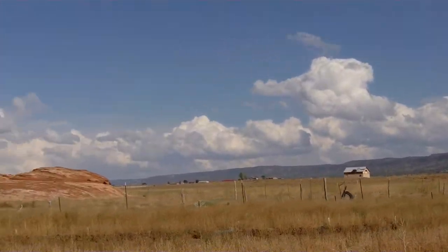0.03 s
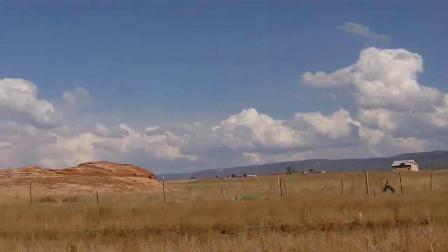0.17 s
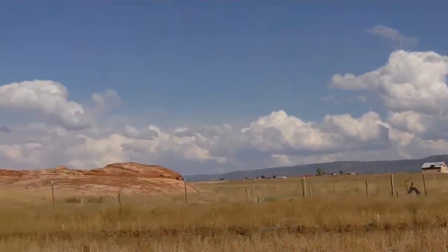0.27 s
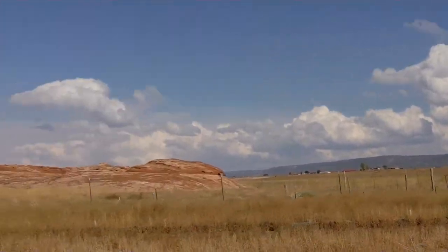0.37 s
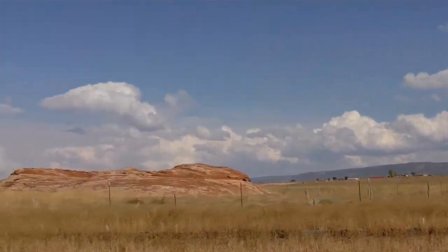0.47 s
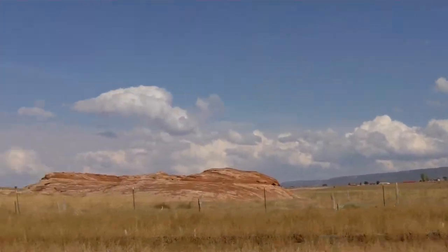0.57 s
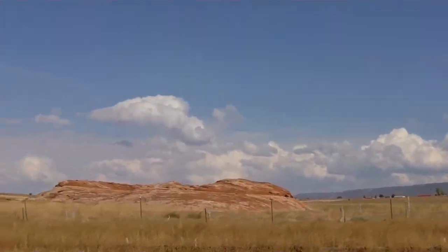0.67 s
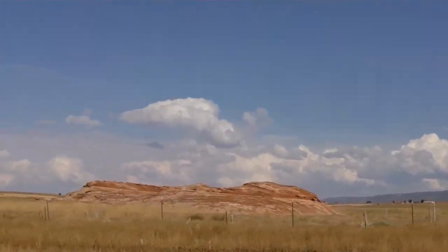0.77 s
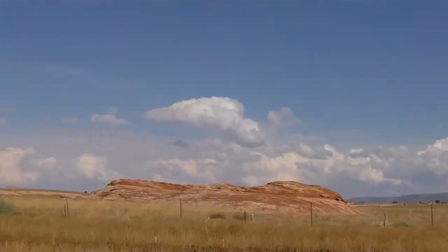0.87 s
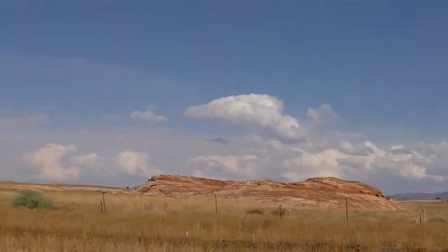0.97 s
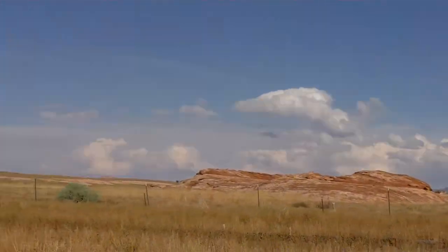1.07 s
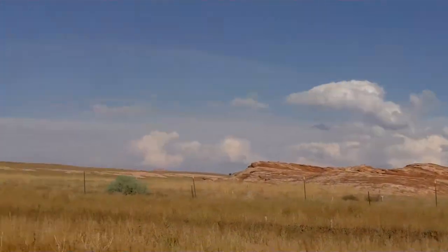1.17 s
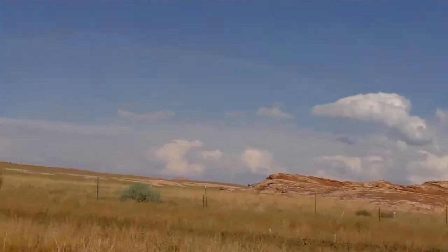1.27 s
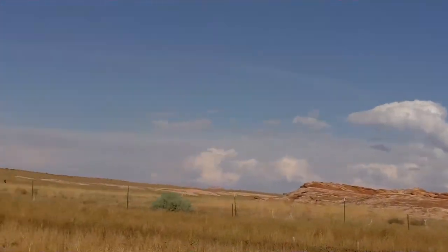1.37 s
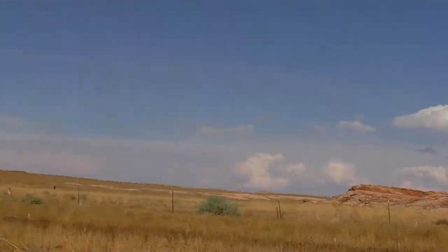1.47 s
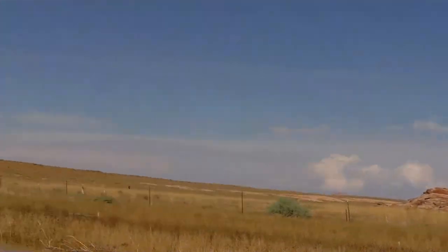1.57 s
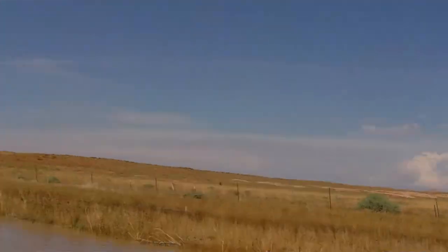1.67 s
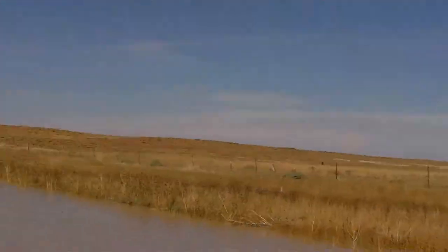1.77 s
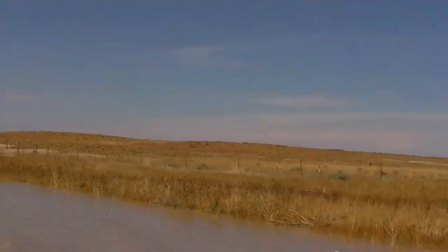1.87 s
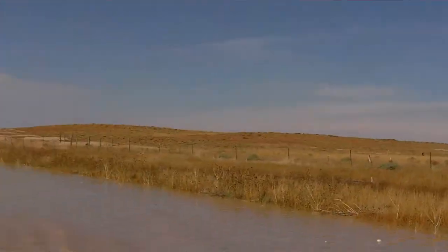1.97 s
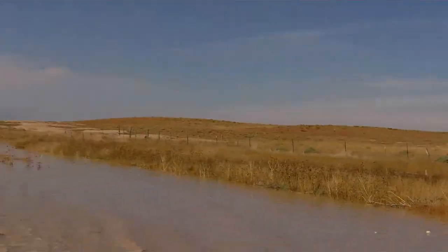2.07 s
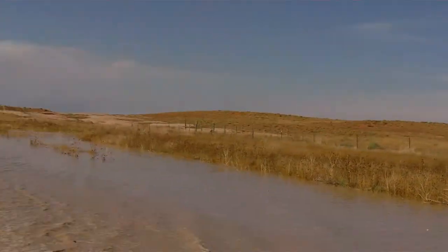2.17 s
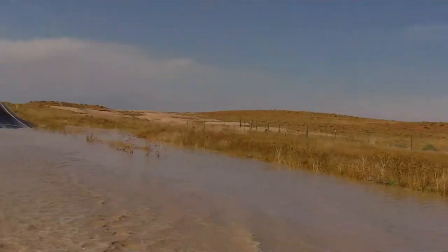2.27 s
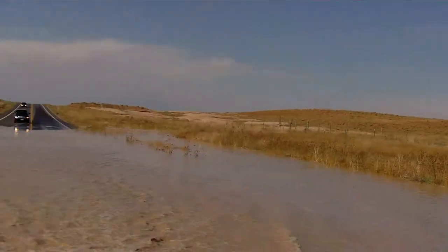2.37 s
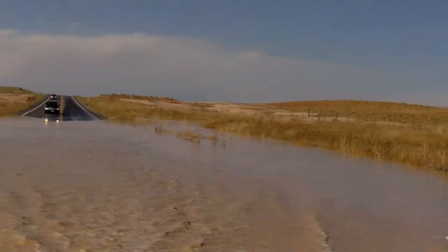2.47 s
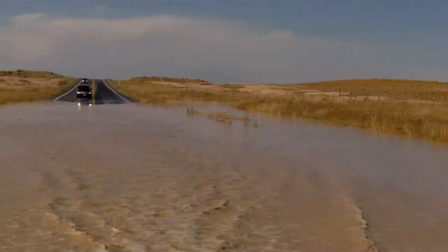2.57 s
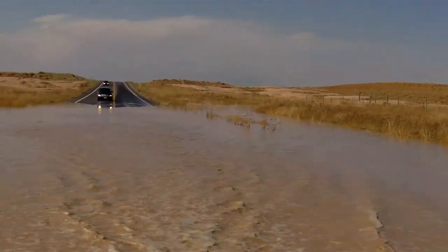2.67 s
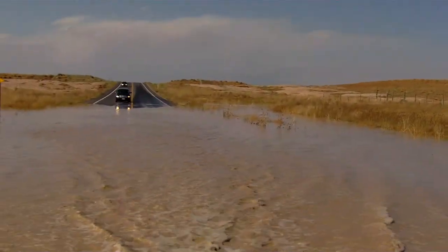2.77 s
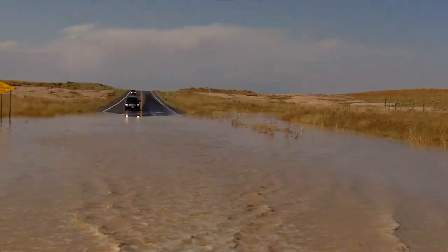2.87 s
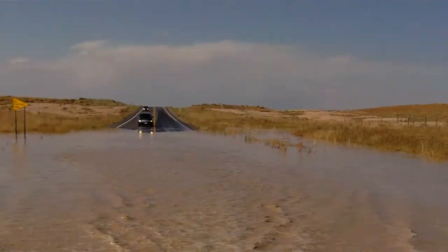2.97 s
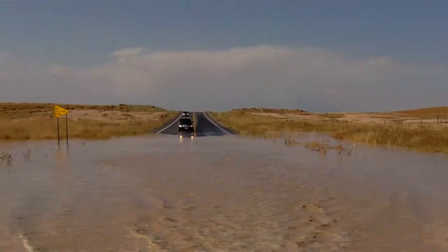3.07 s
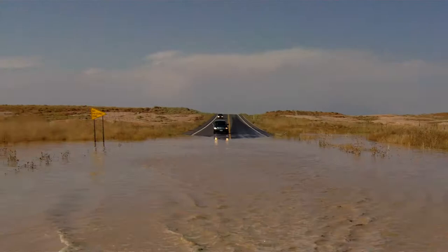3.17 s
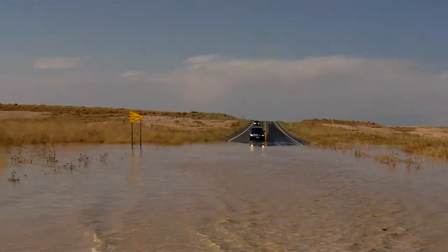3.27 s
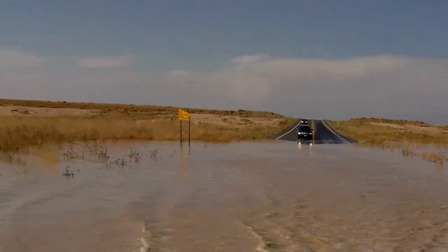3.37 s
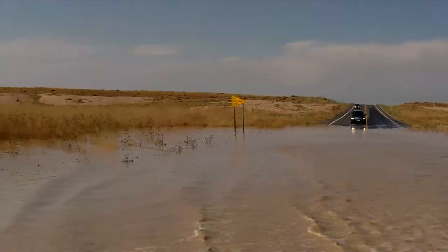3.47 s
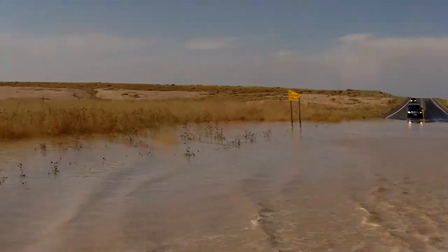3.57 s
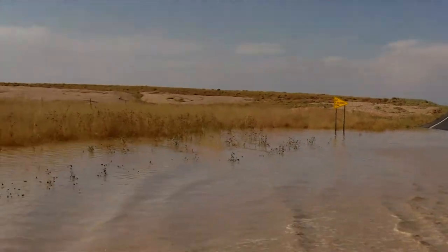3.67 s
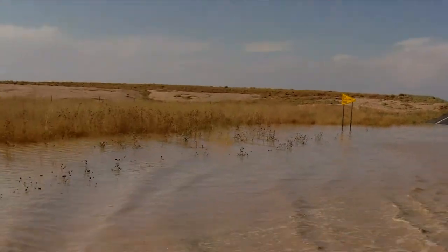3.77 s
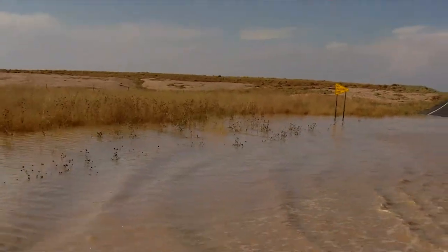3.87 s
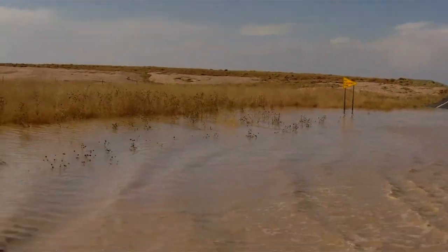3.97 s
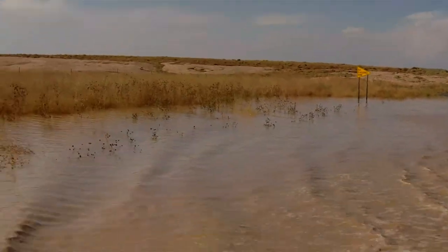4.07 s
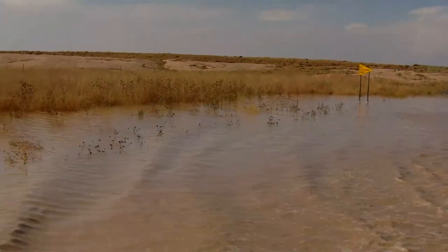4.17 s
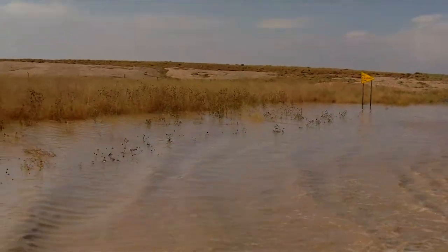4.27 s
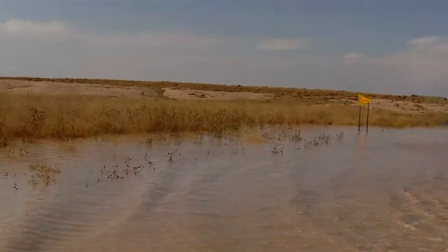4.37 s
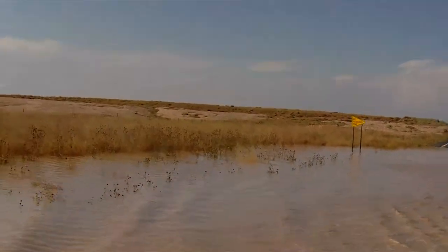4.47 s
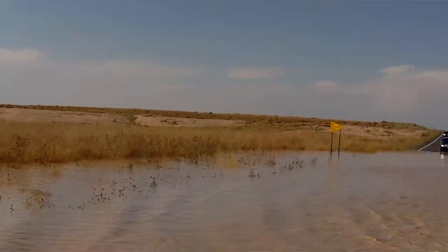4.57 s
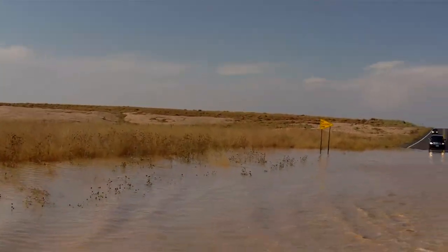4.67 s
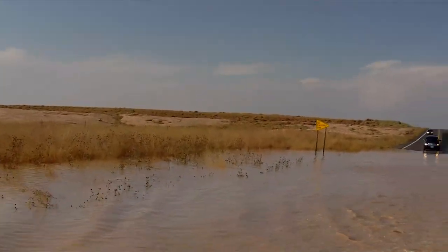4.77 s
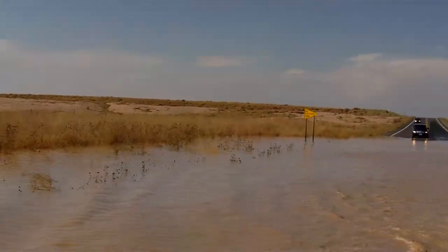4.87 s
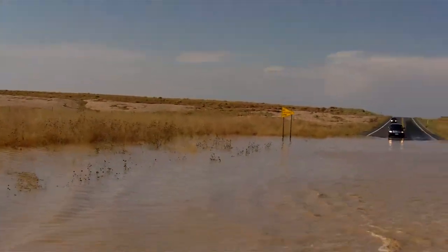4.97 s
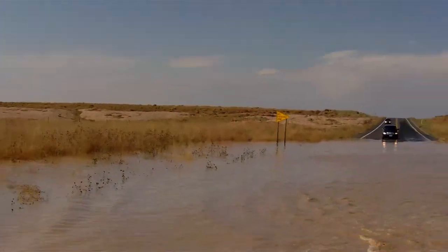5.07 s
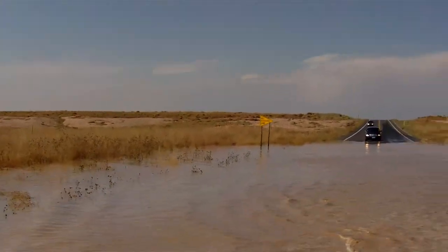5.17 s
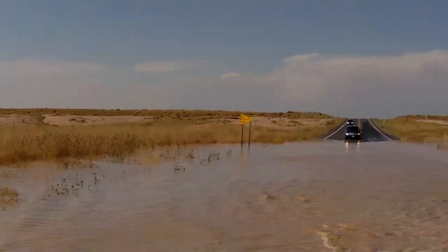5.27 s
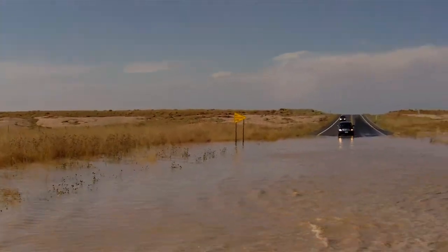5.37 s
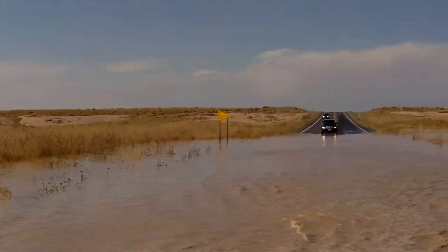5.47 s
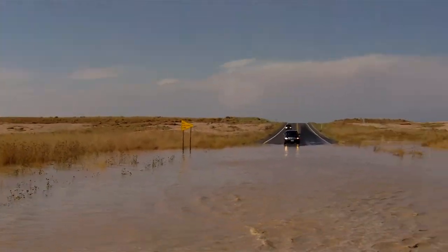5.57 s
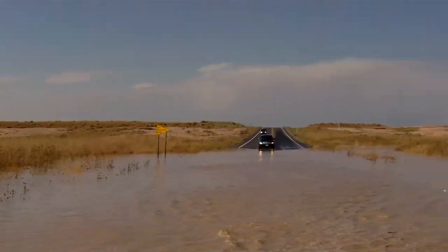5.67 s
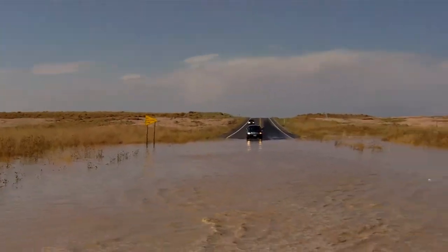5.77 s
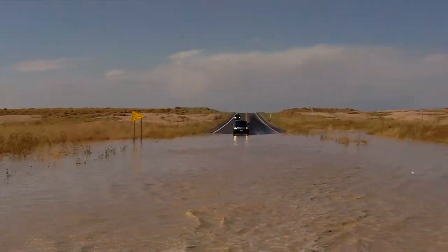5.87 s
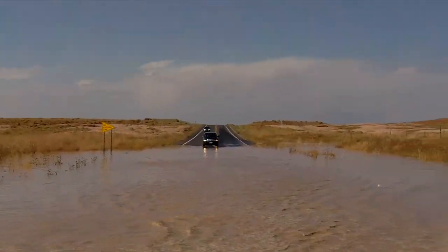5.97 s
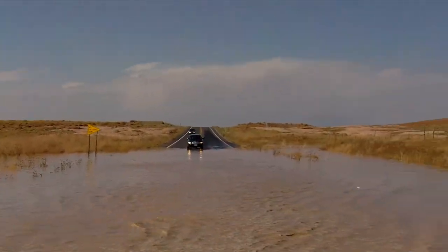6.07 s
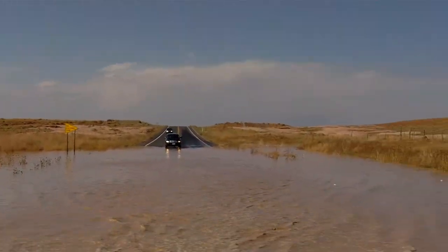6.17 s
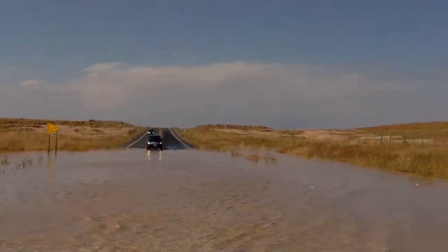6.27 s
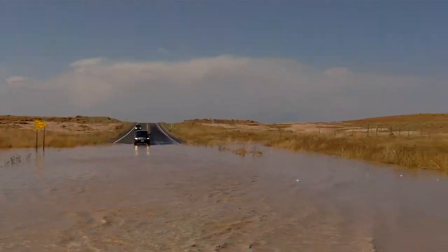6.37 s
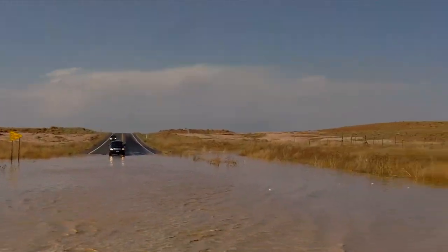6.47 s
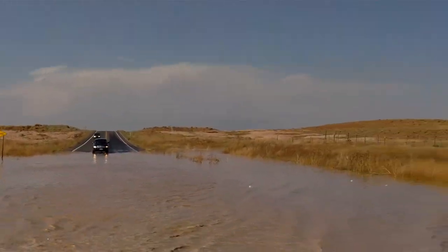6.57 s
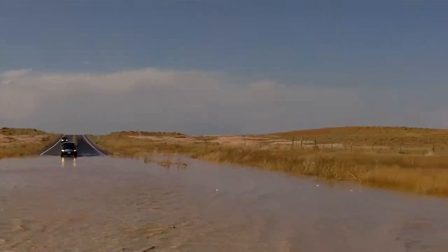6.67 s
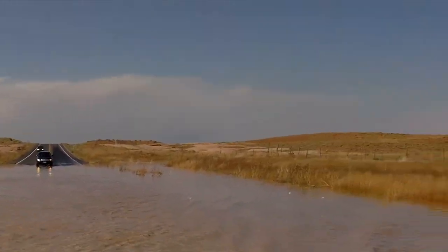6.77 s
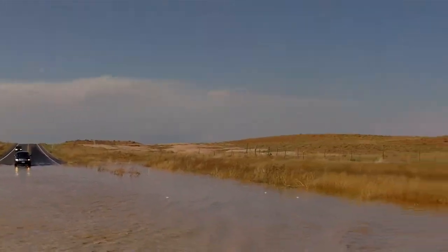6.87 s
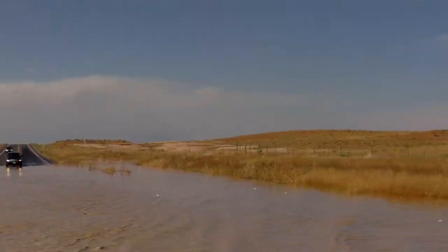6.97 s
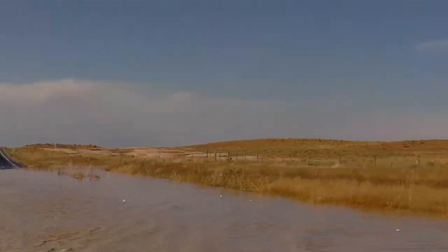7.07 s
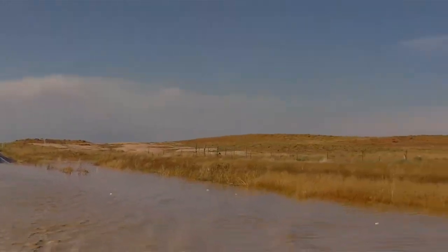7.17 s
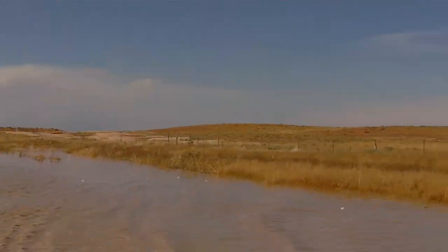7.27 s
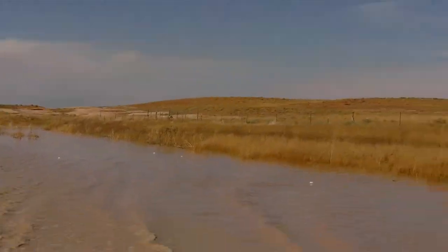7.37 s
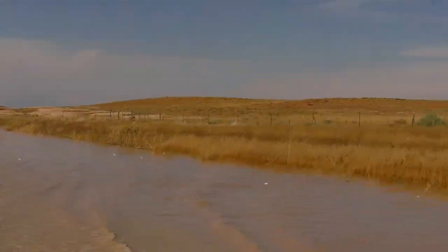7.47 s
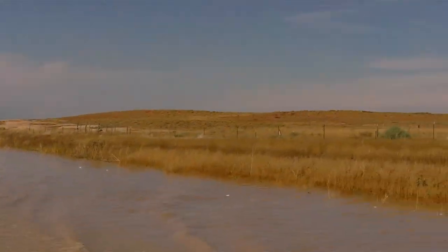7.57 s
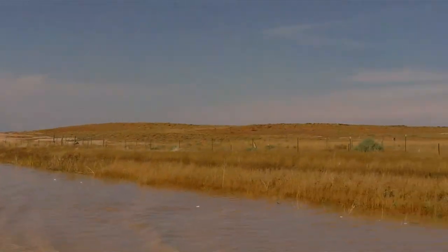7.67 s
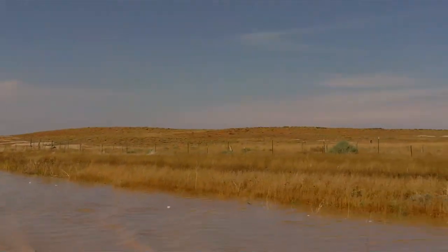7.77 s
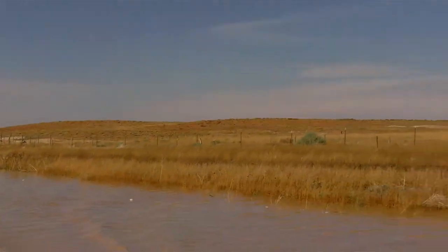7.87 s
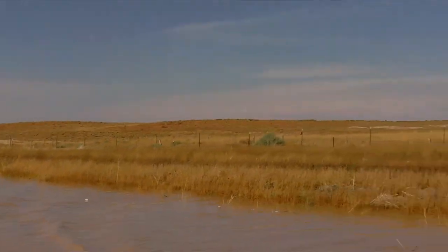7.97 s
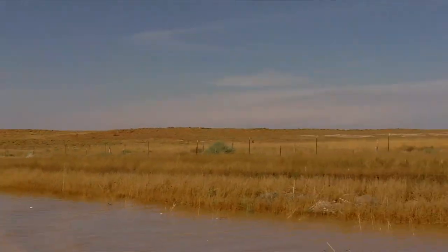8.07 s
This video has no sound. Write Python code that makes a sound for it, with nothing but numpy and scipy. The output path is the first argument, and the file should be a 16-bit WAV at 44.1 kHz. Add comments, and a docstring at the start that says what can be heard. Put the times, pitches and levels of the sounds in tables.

```python
"""A bow wave churns and gurgles, its wash slaps the bodywork and spray hisses in surges: a vehicle wades
slowly through deepening floodwater, heard from its window. Low blips stand out, drops snap nearby, the
floor pan thumps, the engine hums faintly. Water is patchy noise plus swarms of bubbles (damped sines of
rising pitch); the engine is three sines. One microphone feeds both channels, the left a sample late."""
import sys
import numpy as np
from scipy import signal
from scipy.fft import rfft, irfft, next_fast_len
from scipy.io import wavfile
from scipy.ndimage import uniform_filter1d, map_coordinates

SR = 44100
rng = np.random.default_rng(int(sys.argv[2]) if len(sys.argv) > 2 else 0)


def digitize_waveform(pressure):
    """Quantize a signal to 16-bit integers and store it at the path in sys.argv[1].

    Rows of a 2-D input are taken as channels; values are limited to [-1, 1].
    """
    field = np.atleast_2d(pressure).T
    bounded = np.clip(field, -1, 1)
    quanta = np.round(bounded * 32767).astype(np.int16)
    wavfile.write(sys.argv[1], SR, quanta)


def attenuation_scalar(level_db):
    """Turn a level in dB into a linear amplitude multiplier (20 dB per decade)."""
    decades = np.asarray(level_db, float) / 20
    return 10 ** decades


N = 358533  # samples


def unit(x):
    """x scaled to rms 1."""
    return x / np.sqrt(np.mean(x ** 2) + 1e-20)


def curves(rows):
    """One value per sample for each column after the time."""
    time_s, *columns = np.transpose(rows)
    return [np.interp(np.arange(N) / SR, time_s, column) for column in columns]


def wobble(knots_per_s):
    """Smooth random curve."""
    return map_coordinates(rng.standard_normal(N // 100), [np.arange(N) * knots_per_s / SR])


def swells(peak_s, swell_db, fall_s):
    """Sum of bell-shaped swells (dips where negative) in dB, quicker to come than to go."""
    rise_share = 0.66  # rise time / fall time
    t = np.arange(0, N + 64, 64) / SR
    age = (t - peak_s[:, None]) / (fall_s * np.ones_like(peak_s))[:, None]
    age = np.where(age < 0, age / rise_share, age)
    bells = swell_db[:, None] * np.exp(-age ** 2)
    return np.interp(np.arange(N) / SR, t, bells.sum(axis=0))


def along(points, hz):
    """(Hz, value) points read on a log frequency axis."""
    f, v = np.transpose(points)
    return np.interp(np.log(hz + 1), np.log(f), v)


def filtered(x, response):
    """x through a complex response of frequency."""
    m = next_fast_len(N + SR // 4)
    return irfft(rfft(x, m) * response(np.fft.rfftfreq(m, 1 / SR)), m)[..., :N]


def high_pass(corner_hz):
    """Zero-phase response, -6 dB at the corner."""
    return lambda hz: 1 / (1 + (corner_hz / (hz + 1)) ** 4)


def coloured(x, spectrum):
    """x shaped by (Hz, dB) points, rms 1."""
    return unit(filtered(x, lambda hz: attenuation_scalar(along(spectrum, hz))))


def patchy(patch_db, bins, frames):
    """Noise whose level drifts in patches of time and frequency, rms 1."""
    z = signal.stft(rng.standard_normal(N), nperseg=512)[2]
    field = uniform_filter1d(rng.standard_normal(z.shape), size=bins, axis=0)
    field = uniform_filter1d(field, size=frames, axis=1)
    return unit(signal.istft(z * attenuation_scalar(patch_db * unit(field)), nperseg=512)[1][:N])


def rising_rings(start_s, hz, gain, cycles, rise, size, onset=6.9):
    """Damped sines with a soft start and a rising pitch, as of a bubble nearing the surface."""
    turns = np.arange(size) / SR * hz[:, None]
    age = turns / cycles  # decay times elapsed
    envelope = (1 - np.exp(-onset * age)) * np.exp(-age)
    shape = envelope * np.sin(2 * np.pi * turns * (1 + rise * age / 2))
    where = (start_s * SR).astype(int)[:, None] + np.arange(size)
    return np.bincount(where.ravel(), (gain[:, None] * shape).ravel(), N + size + 1)[:N]


def swarm(count, hz, octaves, spread_db, cycles, rise, size):
    """Bubbles at random times, log-normal in pitch and in amplitude, rms 1."""
    start_s = rng.random(count) * N / SR
    tone, big = rng.standard_normal((2, count))
    pitch_hz = np.clip(hz * 2 ** (octaves * tone), 300, 15000)
    return unit(rising_rings(start_s, pitch_hz, attenuation_scalar(spread_db * big), cycles, rise, size))


# flow under the swells and dips: (time [s], churn level [dB], wash level [dB], spray level [dB])
FLOW_LEVELS = [(0.0, -30, -38.5, -51.5), (0.7, -30, -37, -50.5), (0.8, -31.5, -38, -51),
               (1.3, -31, -36.5, -44.5), (1.75, -29, -36.5, -44.5), (1.87, -27.5, -31.5, -40.5),
               (2.28, -27, -33.5, -35), (2.45, -26.5, -31.5, -32), (2.8, -25, -30.5, -32),
               (3.2, -26.5, -31, -33), (3.45, -25.5, -29, -30), (4.3, -26, -27, -31),
               (5.0, -25.5, -29, -31.5), (5.45, -25, -27, -28.5), (5.55, -26, -31, -36.5),
               (6.0, -26, -31, -36), (6.8, -29.5, -29.5, -34.5), (7.25, -27, -29, -33.5),
               (7.55, -28, -27, -32), (8.13, -25.5, -30, -35)]
# swells and dips of the water's level, with a burst of short clicks near 2.35 s:
# (peak time [s], fall time [s], churn swell [dB], wash swell [dB], spray swell [dB])
WATER_SWELLS = [(0.035, 0.036, 1.5, 1.5, 1), (0.29, 0.05, 0.5, 0.5, -1), (0.603, 0.058, -0.5, 1.5, 2),
                (0.91, 0.057, 0.5, 2.5, 3), (0.96, .03, 3, -2, -5), (1.215, 0.044, 0.5, -0.5, 3),
                (1.36, 0.043, 0, 2, 2), (1.59, 0.15, -0.5, 2, 2), (1.897, 0.057, -1, 2, 5),
                (2.053, 0.03, 0, 2.5, 4), (2.17, 0.037, 0.5, 1.5, 2.5), (2.33, .007, 0, -5, 6.5),
                (2.352, 0.0073, 0, 4, 9), (2.376, 0.011, -3, -1, 6.5), (2.38, 0.057, 2, 4, -1),
                (2.583, 0.072, -0.5, 4, 3), (2.747, 0.063, 0.5, 2.5, 3), (2.938, 0.035, -0.5, 2, 4.5),
                (3.037, 0.023, 1, 3, 3), (3.146, 0.015, 1, 2.5, 3), (3.37, 0.062, 0.5, 3, 2.5),
                (3.557, 0.048, 1, 4, 4), (3.89, 0.021, 3.5, 2, 4), (4.108, 0.051, 0.5, 2, 3.5),
                (4.224, 0.026, 0.5, 1.5, 2.5), (4.55, 0.084, 0, -0.5, 3), (4.61, 0.024, -0.5, 2.5, 0),
                (4.744, 0.03, 1, 0.5, 5.5), (4.85, 0.037, 1, 1.5, 4), (4.902, 0.067, -2, 3, 3.5),
                (4.97, 0.066, 1.5, 3, 3), (5.048, 0.04, -2, 1.5, 0.5), (5.13, 0.024, 1.5, 4, 6),
                (5.213, 0.045, -1, 1.5, 1.7), (5.435, 0.041, 0.5, 1.5, 0), (5.677, 0.22, -1, 2, 8),
                (5.83, 0.079, 1, 3, 5), (5.99, 0.048, -1, 1.5, 6.5), (6.076, 0.054, -0.5, 2, 6.5),
                (6.21, 0.052, 0.5, 1, 4.5), (6.338, 0.0054, -2, 4, 8.5), (6.416, 0.054, 0.5, 2, 6.5),
                (6.595, .04, 1, -1, 4), (6.648, 0.031, 2.5, 3.5, 4.5), (6.69, .05, 1, 2.5, 5.5),
                (6.9, 0.05, 3, 2, 4), (7.118, 0.034, -2, 1, 3), (7.327, 0.036, -0.5, 0, 4),
                (7.49, 0.05, 2, 2, 1.5), (7.666, 0.035, 0, 3.5, 2), (7.842, 0.026, 1, 4.5, 5.5),
                (7.916, 0.039, 0, 4, 2), (8.005, 0.023, -0.5, 4.5, 2)]


def water():
    """Churn, wash and spray ride one flow; the finer the water, the more unsteady its level."""
    churn_db, wash_db, spray_db = curves(FLOW_LEVELS)
    peak_s, fall_s, *swell_db = np.transpose(WATER_SWELLS)
    churn_swell_db, wash_swell_db, spray_swell_db = (swells(peak_s, db, fall_s) for db in swell_db)
    surge, flutter = wobble(36), wobble(60)  # shared by the layers
    churn_level_db = churn_db + churn_swell_db - 0.4 * wobble(22) + 0.13 * surge
    wash_level_db = wash_db + wash_swell_db + 0.05 * wobble(14) + 0.11 * surge + 0.44 * flutter
    spray_level_db = spray_db + spray_swell_db - 0.22 * wobble(16) + 0.71 * surge + 0.76 * flutter
    return (attenuation_scalar(churn_level_db) * churn(churn_swell_db, wash_swell_db)
            + attenuation_scalar(wash_level_db) * wash(spray_swell_db)
            + attenuation_scalar(spray_level_db) * spray(spray_db))


GRAIN_GROWS = 0.077  # bubble level over noise, dB per dB of swell
# bow wave spectrum: (frequency [Hz], density [dB per Hz])
CHURN_SPECTRUM = [(100, -41), (160, -28), (250, -11), (400, -3.5), (650, -1), (1000, -3.5), (1400, -6),
                  (1700, -11), (2500, -14.5), (5000, -73)]


def churn(churn_swell_db, wash_swell_db):
    """Bow wave: low patchy noise with two swarms of bubbles that stand out in the swells."""
    gurgle = swarm(count=5000, hz=1405, octaves=0.401, spread_db=2.5, cycles=4.75, rise=0.114, size=900)
    burble = swarm(count=4000, hz=900, octaves=0.355, spread_db=1.0, cycles=2.3, rise=0.16, size=900)
    grains = attenuation_scalar(-15.0 + GRAIN_GROWS * wash_swell_db) * gurgle
    grains = grains + attenuation_scalar(-14.5 + GRAIN_GROWS * churn_swell_db) * burble
    return coloured(patchy(0.52, bins=4, frames=8) + grains, CHURN_SPECTRUM)


# wash spectrum: (frequency [Hz], density [dB per Hz])
WASH_SPECTRUM = [(500, -37.5), (1100, 1.5), (1700, -2.5), (2500, -4), (3000, -6), (4200, -10),
                 (6000, -13.5), (10000, -26), (15500, -41)]


def wash(spray_swell_db):
    """Wash on the bodywork: patchy noise with short splash bubbles that stand out in the swells."""
    splash = swarm(count=12000, hz=2792, octaves=0.617, spread_db=1.5, cycles=2.2, rise=0.12, size=240)
    grains = attenuation_scalar(-9.0 + GRAIN_GROWS * spray_swell_db) * splash
    return coloured(patchy(0.84, bins=10, frames=40) + grains, WASH_SPECTRUM)


# thin spray is duller: above AIR_HZ it loses AIR_GROWS dB per dB of flow level under AIR_FULL_DB
AIR_HZ, AIR_GROWS, AIR_FULL_DB = 8500, 0.077, -20.5
# spray spectrum: (frequency [Hz], density [dB per Hz])
SPRAY_SPECTRUM = [(1000, -45), (2500, -7), (4000, -4.5), (5500, -5), (7000, -5), (10000, -6.5),
                  (13000, -11.5), (14200, -16), (15500, -21)]


def spray(flow_db):
    """Spray: patchy hiss with a fizz of tiny bubbles, brighter as the flow builds."""
    fizz = swarm(count=20000, hz=8040, octaves=0.56, spread_db=4.5, cycles=0.83, rise=0.089, size=60)
    hiss = coloured(patchy(1.4, bins=16, frames=4) + attenuation_scalar(-4.0) * fizz, SPRAY_SPECTRUM)
    air = filtered(hiss, high_pass(AIR_HZ))
    return hiss + (attenuation_scalar(AIR_GROWS * (flow_db - AIR_FULL_DB)) - 1) * air


BLIP_LOW_HZ = 350  # corner of the bass cut
# short low blips that stand out of the churn: (time [s], level [dB], starting pitch [Hz])
BLIP_EVENTS = [(0.04, -16, 900), (0.092, -17, 883), (0.296, -16, 800), (1.606, -16, 700), (1.735, -17, 695),
               (2.125, -9, 1050), (2.27, -13, 813), (2.353, -6, 980), (2.3738, -12, 1250),
               (2.707, -20, 1150), (3.39, -2, 1330), (3.408, -11, 744), (4.2153, -18, 1060),
               (4.346, -14, 677), (4.406, -9, 945), (4.475, -7, 1420), (4.523, -13, 875), (4.959, -2, 975),
               (5.436, -18, 1380), (5.695, -16, 969), (6.64, -11, 1500), (6.6525, -8, 1010),
               (6.657, -5, 1200), (6.696, -13, 1050), (7.142, -11, 754), (7.157, -12, 1100),
               (7.642, -11, 1200), (7.662, -15, 1550), (7.679, -13, 1400), (7.796, -10, 1010)]


def blips():
    """Short low blips over the churn: damped sines of slightly rising pitch."""
    start_s, level_db, hz = np.transpose(BLIP_EVENTS)
    rings = rising_rings(start_s, hz, attenuation_scalar(level_db), cycles=1.9, rise=0.013, size=1200, onset=1.6)
    return filtered(rings, high_pass(BLIP_LOW_HZ))


DROP_LOW_HZ = 900  # small bubbles radiate little below this
# near drops: (time [s], level [dB], starting pitch [Hz], decay [cycles])
DROP_EVENTS = [(2.35, -13, 5400, 2), (2.5793, -17, 3970, 2.5), (2.947, -12, 6500, 2.5),
               (3.361, -8, 6500, 3), (3.572, -17, 7000, 2), (3.8756, -8, 4080, 2.5),
               (4.0765, -18, 1700, 2.5), (4.2046, -19, 3470, 2.5), (4.223, -12, 6500, 2),
               (4.932, -5, 4340, 3), (5.129, -5, 3080, 2.7), (4.959, -14, 5100, 2.5), (5.138, -10, 5100, 3),
               (5.746, -12, 2190, 2.5), (5.944, -12, 2540, 2.5), (6.0314, -18, 4770, 2.5),
               (6.3364, -4, 4800, 2.7), (6.54, -9, 2300, 2.5), (6.665, -13, 2550, 2.5),
               (7.113, -14, 2450, 3), (7.138, -12, 3300, 4), (7.144, -18, 2750, 3), (7.668, -8, 2350, 2.5),
               (7.676, -10, 3000, 3), (7.797, -8, 1910, 2.5), (7.8378, -14, 2600, 2),
               (7.847, -6, 2200, 2.7), (8.1025, -2, 3230, 1.8)]


def drops():
    """Single near drops: a sharp snap over a few cycles of ringing."""
    start_s, level_db, hz, cycles = np.transpose(DROP_EVENTS)
    ring = rising_rings(start_s, hz, attenuation_scalar(level_db), cycles[:, None], rise=0.005, size=500, onset=1.6)
    snap = rising_rings(start_s, 0.99 * hz, attenuation_scalar(level_db - 13.0), cycles=0.62, rise=0.03, size=60)
    return filtered(ring + snap, high_pass(DROP_LOW_HZ))


THUMP_FALL_S, PAN_HZ, PAN_DB = 0.011, 127, -52.5  # PAN_DB: ring level at zero swell
# rumble under the floor: (time [s], level [dB])
RUMBLE_LEVELS = [(0.0, -53), (0.5, -59), (2.6, -60), (3.4, -51), (4.3, -58), (5.4, -58), (5.8, -64),
                 (6.9, -61.5), (8.13, -62)]
# rumble spectrum: (frequency [Hz], density [dB per Hz])
FLOOR_SPECTRUM = [(15, -46), (30, -37), (60, -15), (100, -7), (140, -0.5), (180, 3.5), (300, -7),
                  (600, -58)]
# water thumps the pan: (peak time [s], swell [dB])
THUMP_SWELLS = [(0.06, 10), (0.17, 9), (1.64, 6), (2.31, 10), (2.9, -2), (3.29, 3), (3.49, 1), (3.83, 8),
                (4.1, 10), (4.66, 11), (5.11, 10), (6.46, 13), (6.97, 13), (7.65, 4), (7.893, 14.5),
                (7.96, 4)]


def floor_pan():
    """Water rumbles under the floor; each thump shifts its level and rings the pan by its swell."""
    rumble_db, = curves(RUMBLE_LEVELS)
    rumble = coloured(attenuation_scalar(2.6 * wobble(8.3)) * rng.standard_normal(N), FLOOR_SPECTRUM)
    peak_s, swell_db = np.transpose(THUMP_SWELLS)
    ring_hz = np.full(len(peak_s), PAN_HZ)
    ring = rising_rings(peak_s - 0.008, ring_hz, attenuation_scalar(PAN_DB + swell_db),
                        cycles=1.35, rise=0.01, size=3000, onset=1.2)
    return ring + attenuation_scalar(rumble_db + swells(peak_s, swell_db, THUMP_FALL_S)) * rumble


FIRING_HZ, FIRING_DB, WAVER_HZ = 45.8, -76.5, 0.7


def engine():
    """Firing tone of wavering pitch with two overtones, each wavering in level."""
    phase = 2 * np.pi * np.cumsum(FIRING_HZ + WAVER_HZ * wobble(3)) / SR
    tone = attenuation_scalar(1.4 * wobble(5)) * np.sin(phase)
    second = attenuation_scalar(-1.0 + 2.1 * wobble(1.32)) * np.sin(2 * phase)
    third = attenuation_scalar(7 + 4 * wobble(1.6)) * np.sin(3 * phase)
    return np.sqrt(2) * attenuation_scalar(FIRING_DB) * (tone + second + third)


SHEET_DB = -50.5
SHEET_FOLLOWS = 0.34  # share of the way from SHEET_DB to the wash level
# sheet spectrum: (frequency [Hz], density [dB per Hz])
SHEET_SPECTRUM = [(1500, -32), (2100, -2), (2700, -4), (3500, -1.5), (4200, -9.5), (5200, -21), (7000, -50)]


def sheet():
    """Flood sheeting over the road further off: a smooth hiss that fills the gaps between surges."""
    wash_db = curves(FLOW_LEVELS)[1]
    level_db = SHEET_DB + SHEET_FOLLOWS * (wash_db - SHEET_DB) + 1.0 * wobble(5.5)
    return attenuation_scalar(level_db) * coloured(patchy(0.56, bins=10, frames=10), SHEET_SPECTRUM)


def scene():
    """All sources at one microphone, on two channels."""
    return np.tile(water() + blips() + drops() + floor_pan() + engine() + sheet(), (2, 1))


def blurred(x, radians):
    """x with the phase of every short slice shaken at random, level kept."""
    z = signal.stft(x, nperseg=256)[2]
    shaken = signal.istft(z * np.exp(1j * radians * rng.standard_normal(z.shape)), nperseg=256)[1][:N]
    return unit(shaken) * np.std(x)


NOTCH_HZ, NOTCH_WIDTH_HZ, NOTCH_DB = 7850, 270, -32


def notch(hz):
    """Second-order response with a narrow treble dip."""
    gap = NOTCH_HZ ** 2 - hz ** 2
    damping = 1j * hz * NOTCH_WIDTH_HZ
    return (gap + attenuation_scalar(NOTCH_DB) * damping) / (gap + damping)


def band_limit(x):
    """A steep low-pass at the top of the band."""
    return signal.sosfilt(signal.butter(12, 15720, fs=SR, output="sos"), x)


LEFT_LAG_S, TOP_HZ = 1 / SR, 15250
# gain of the left-right difference: (frequency [Hz], gain [dB])
SIDE_GAIN = [(100, -26), (400, -10), (800, -8), (1400, -14), (2000, -8), (3000, -2.5), (4500, 0.5),
             (15000, -2)]


def record(dry):
    """Left lags, the difference is smeared (bass nearly mono, treble wide), then notch and band limit."""
    lag_s = np.array([[LEFT_LAG_S], [0]])
    left, right = filtered(dry, lambda hz: np.exp(-2j * np.pi * hz * lag_s))
    mid = (left + right) / 2
    side = blurred((left - right) / 2, radians=0.63)
    side = filtered(side, lambda hz: attenuation_scalar(along(SIDE_GAIN, hz)))
    pair = np.array([mid + side, mid - side])
    mix = filtered(pair, lambda hz: notch(hz) * (hz < TOP_HZ))
    return band_limit(mix)


dry = scene()
out = record(dry)
digitize_waveform(out)
```